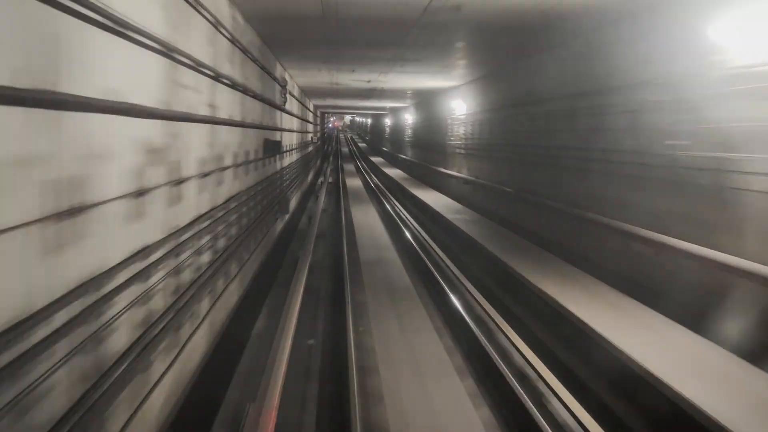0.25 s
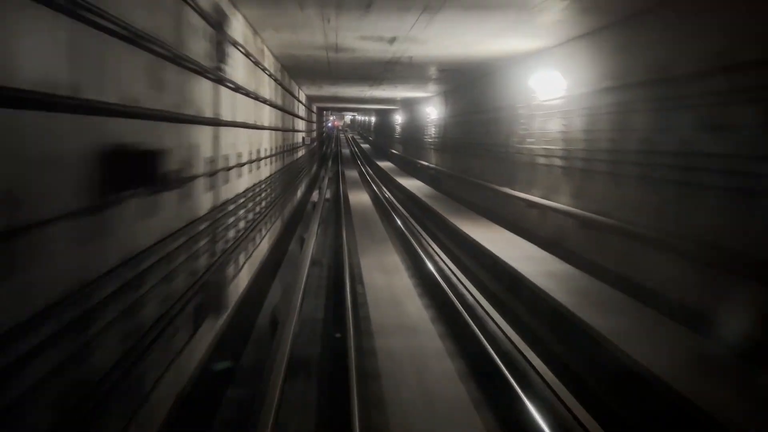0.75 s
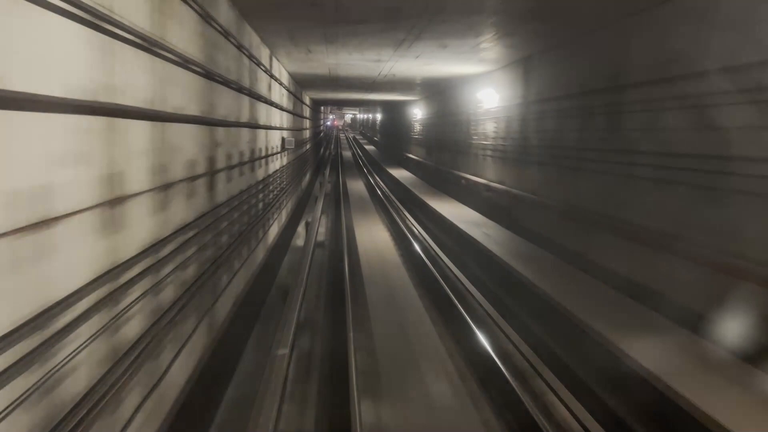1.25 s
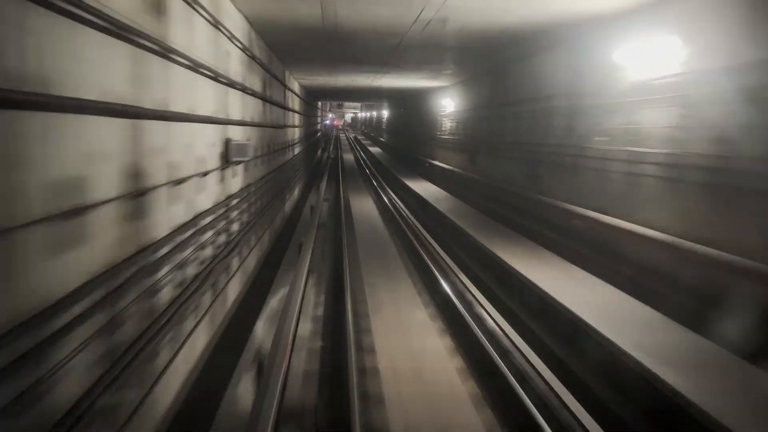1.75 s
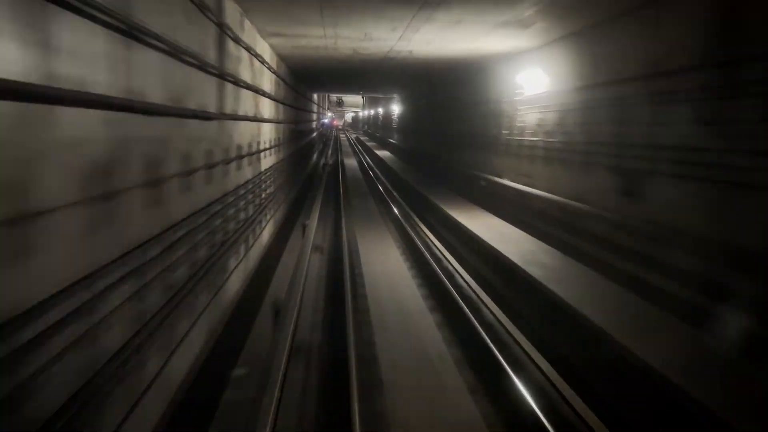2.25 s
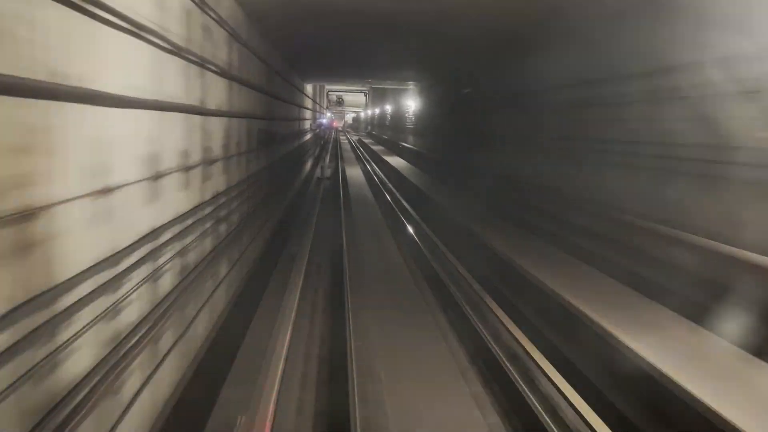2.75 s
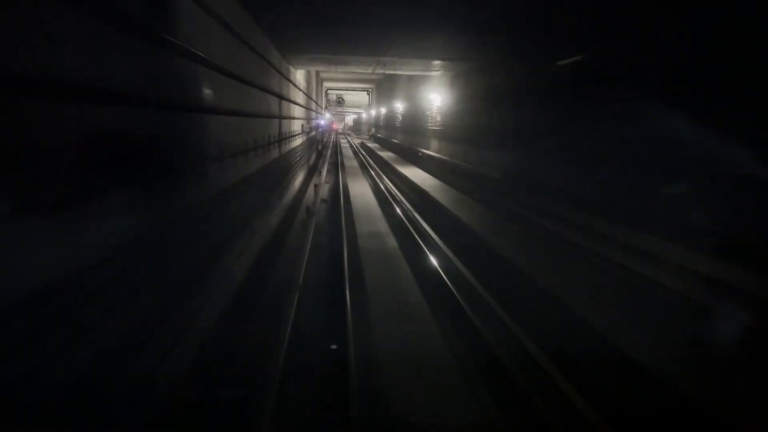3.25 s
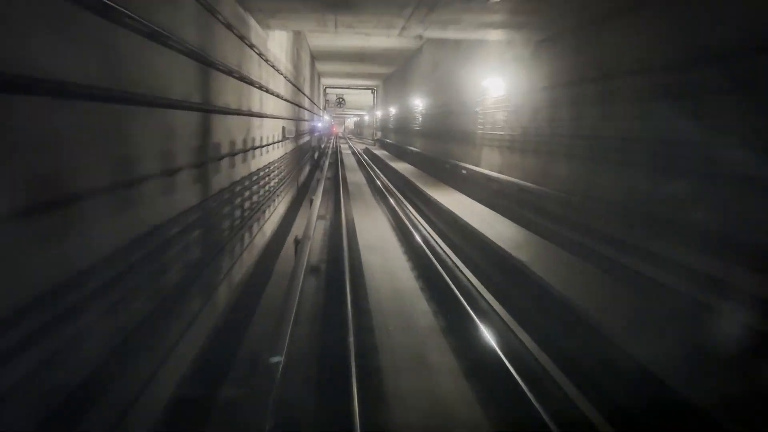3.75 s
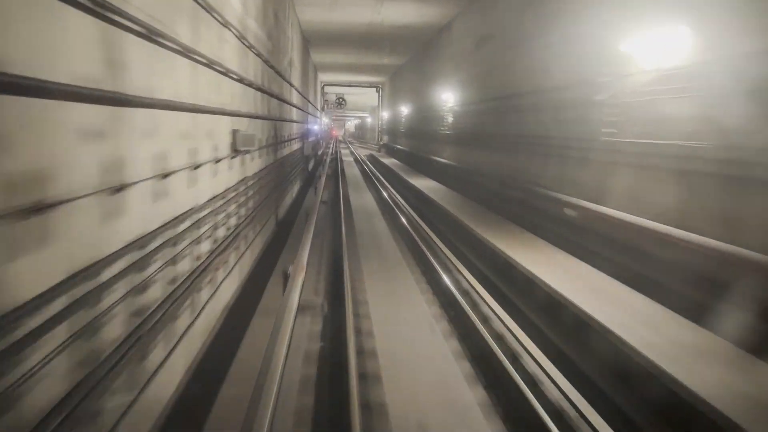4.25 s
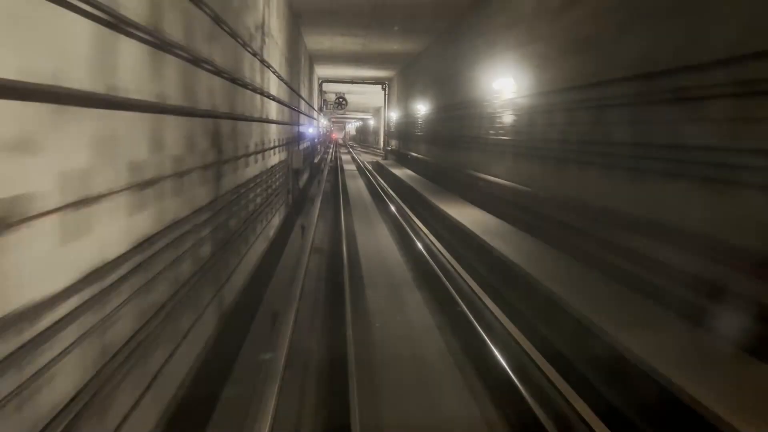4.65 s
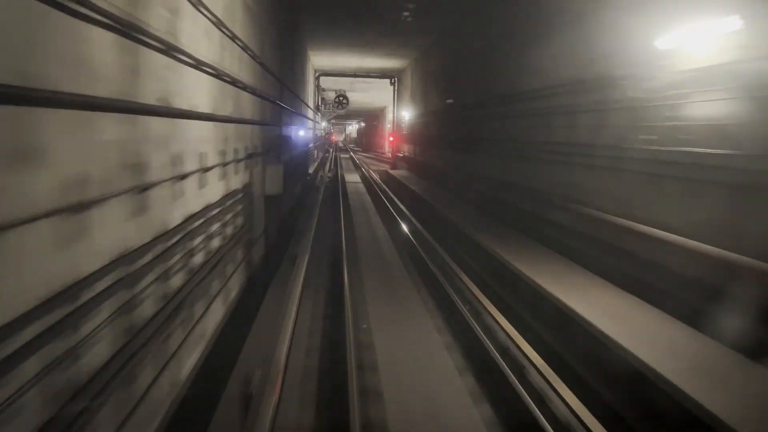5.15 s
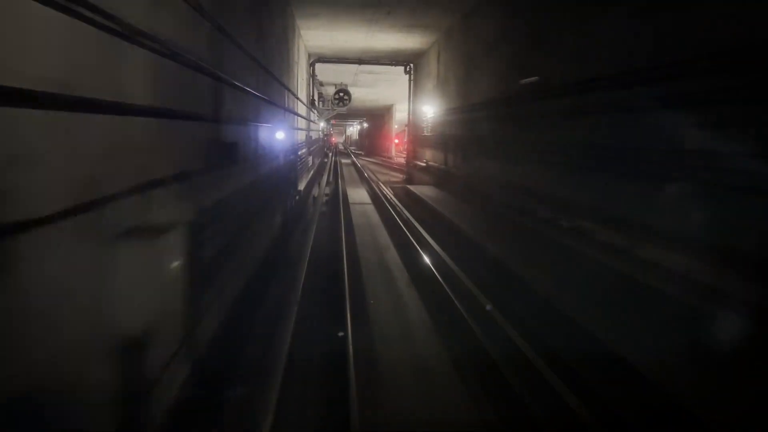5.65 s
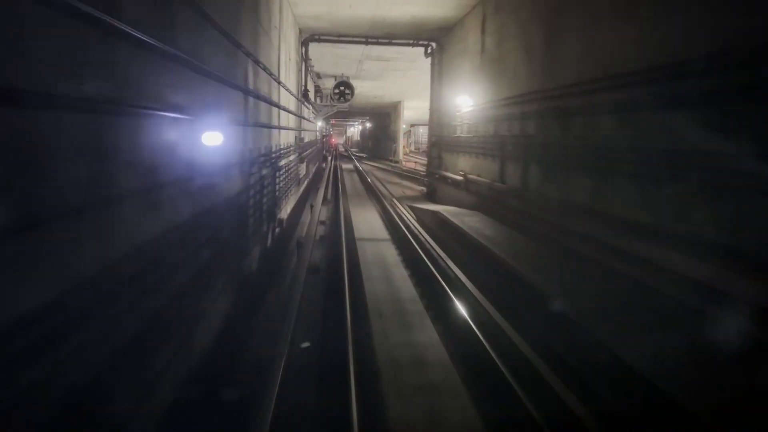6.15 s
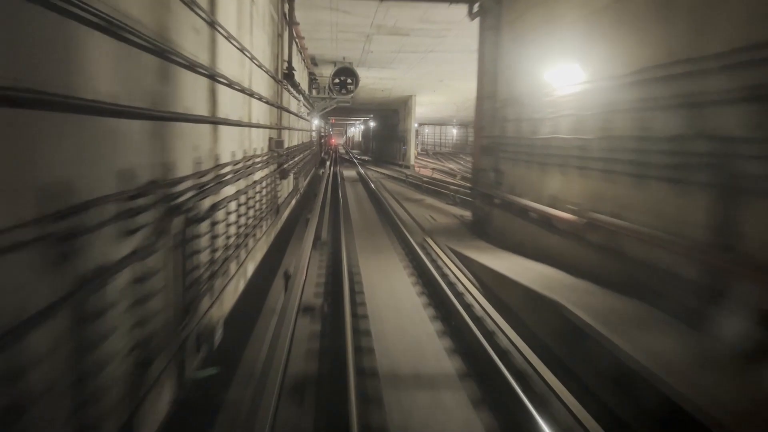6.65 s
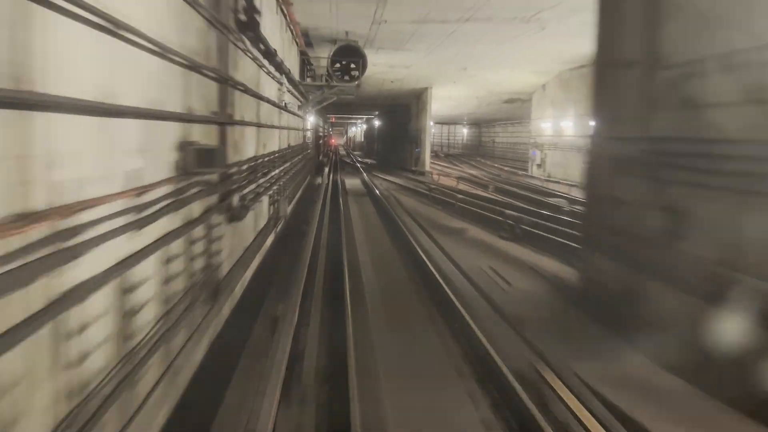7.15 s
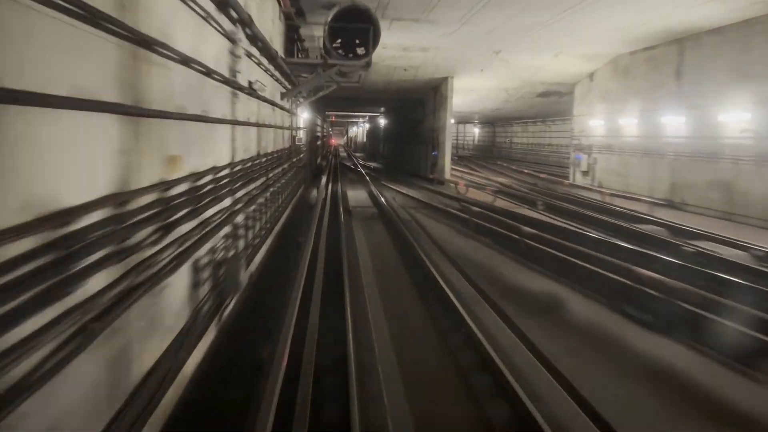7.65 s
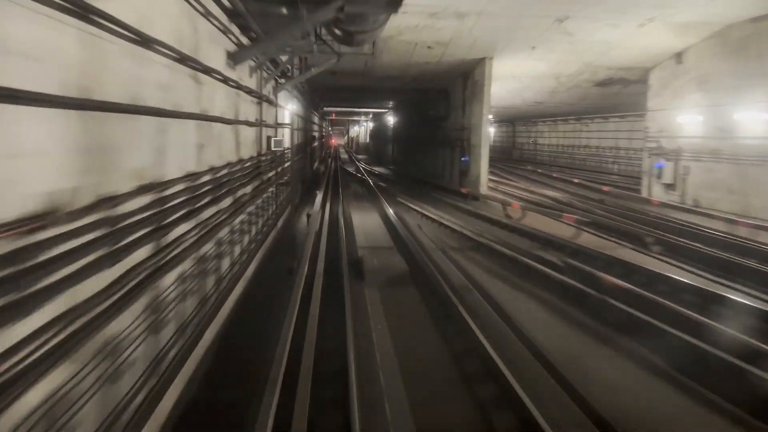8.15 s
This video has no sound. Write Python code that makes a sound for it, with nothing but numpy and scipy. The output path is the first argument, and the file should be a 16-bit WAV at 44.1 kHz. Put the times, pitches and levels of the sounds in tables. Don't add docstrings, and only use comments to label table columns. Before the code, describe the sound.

Inside a speeding subway cab, rails sing a wavering low-mid drone over bass rumble and motor hum, with small panel ticks and late flange moans.

```python
import sys
import numpy as np
from scipy import signal
from scipy.io import wavfile
from scipy.ndimage import uniform_filter1d

SR = 44100
rng = np.random.default_rng(int(sys.argv[2]) if len(sys.argv) > 2 else 0)


def rack_gain(trim_db):
    fader = np.asarray(trim_db, float)
    return 10 ** (fader / 20)


def wav_record(signal):
    frames = np.transpose(np.atleast_2d(signal))
    bounded = np.clip(frames, -1, 1)
    quanta = np.round(bounded * 32767).astype(np.int16)
    wavfile.write(sys.argv[1], SR, quanta)


N = 370440


def evened(x):
    return x / np.sqrt(np.mean(x ** 2) + 1e-20)


def read(rows, hz):
    f, *columns = np.transpose(rows)
    return [np.interp(np.log(hz + 1), np.log(f + 1), c) for c in columns]


def follow(rows, t):
    s, *columns = np.transpose(rows)
    return [np.interp(t, s, c) for c in columns]


def bump(t, middle, length):
    return np.cos(np.pi * np.clip((t - middle) / length, -.5, .5)) ** 2


def slow_noise(seconds):
    span = int(seconds * SR)
    return evened(uniform_filter1d(uniform_filter1d(rng.standard_normal(N), span), span))


def steadied(x, seconds, share):
    power = uniform_filter1d(x.mean(0) ** 2, int(seconds * SR))
    power = uniform_filter1d(power, int(seconds * SR / 2))
    return evened(x / (abs(power) + 1e-9) ** (np.clip(share, 0, 1) / 2))


# (time [s], level [dB])
WALLS = [(0, -0.5), (1.3, .5), (2.3, 0), (3.5, -0.5), (4.8, -1.5), (5.7, -1.5), (6.1, -1.5), (7.5, -2),
         (8.0, -4), (8.4, -5)]


def walls(t):
    return follow(WALLS, t)[0]


# (time [s], speed [share of full], width [share 0-1 of the wide tunnel section])
SPEED = [(0, 1, 0.11), (3.3, 1, 0), (4.8, 1, 0.5), (5.8, .98, 0.9), (6.4, .95, 1), (7.2, .93, 0.93),
         (8.4, 0.88, 0.84)]
# (frequency [Hz], width [Hz], narrow-tunnel level over the wash [dB], wide-tunnel level over the wash [dB])
WHEELS = [(358.5, 49, 8.5, 11.5), (727.4, 36, 7.5, 9.5), (2170, 150, 7.5, 7), (2550, 90, -3, 10),
          (2954, 140, 8, -7.5)]
# (frequency [Hz], width [Hz], narrow-tunnel level over the wash [dB], wide-tunnel level over the wash [dB])
CAB = [(478, 20, 3, 2), (580, 18, 5, 4), (630, 16, 6, 9), (800, 20, 3, 0), (890, 25, 5, 3),
       (1003, 22, 5, 9), (1102, 28, 7, 5), (1230, 25, 5, 5), (1570, 60, 0, -3), (2095, 30, 3, 0),
       (2215, 18, 5, 0), (3390, 25, 2, 2), (4850, 320, 3, 3)]


def resonances(hz, t):
    speed, wide = follow(SPEED, t)
    wide = np.clip(wide, 0, 1)
    lift = 1
    for modes, factor in ((WHEELS, speed), (CAB, np.ones_like(speed))):
        for mode_hz, width, narrow_db, wide_db in modes:
            peak = 1 / (1 + (2 * (hz[:, None] - mode_hz * factor) / width) ** 2)
            lift = lift + rack_gain(2 * (narrow_db + wide * (wide_db - narrow_db))) * peak
    return 10 * np.log10(lift)


# (frequency [Hz], likeness [0-1], left lead [rad], left minus right level [dB])
PORTS = [(30, 1, 0, 0), (190, .996, 0, -.4), (370, .95, .15, -3), (480, .8, .1, -2), (570, .45, .5, -2),
         (700, .7, .3, 0), (830, .35, 2.3, 0), (1050, .85, 3, -3), (1400, .3, 3, 0), (2600, .4, .7, 1),
         (3500, .15, .5, 2), (5500, .15, .8, 8), (7800, .35, 1, 1), (10000, .9, -3.1, 0),
         (11800, .95, -6.3, 0), (15600, .95, -12.6, 0)]


def wash(colour, patchy_db, ringing=True):
    frame, hop = 4096, 1024
    hz = np.fft.rfftfreq(frame, 1 / SR)
    t = np.arange(N // hop + 5) * hop / SR
    silent = np.count_nonzero(hz > colour[-1][0])
    hz = hz[:-silent]
    a, b, c, d, patches = rng.standard_normal((len(t), len(hz), 5)).T
    patches = uniform_filter1d(patches, size=20, axis=0)
    patches = evened(uniform_filter1d(patches, size=5, axis=1))
    field_db = read(colour, hz)[0][:, None] + patchy_db * patches
    if ringing:
        field_db = field_db + resonances(hz, t)

    same, lead, pan_db = (v[:, None] for v in read(PORTS, hz))
    same = np.clip(same, 0, 1)
    left = a + 1j * b
    right = same * left * np.exp(-1j * lead) + np.sqrt(1 - same ** 2) * (c + 1j * d)
    z = np.array([left * rack_gain(pan_db / 2), right * rack_gain(-pan_db / 2)]) * rack_gain(field_db)
    z = np.pad(z, ((0, 0), (0, silent), (0, 0)))
    x = signal.istft(z, nperseg=frame, noverlap=frame - hop)[1][:, :N]
    return x / np.sqrt(np.mean(x.mean(0) ** 2))


# (middle time [s], length [s], level [dB], pitch [Hz])
PATCHES = [(0.251, .16, -17, 368.8), (0.559, 0.13, -22.5, 368.8), (0.908, 0.21, -16.5, 371),
           (1.118, 0.23, -21.5, 370), (1.464, 0.14, -14.5, 366), (1.88, 0.17, -22, 371),
           (2.114, 0.12, -18, 366), (2.415, 0.24, -14, 364), (2.568, 0.11, -18, 359),
           (2.772, 0.14, -14, 366), (2.907, 0.13, -23, 363.2), (3.087, .14, -24, 362.6),
           (3.239, .14, -22.5, 363.5), (3.452, 0.18, -16, 368.5), (3.661, 0.13, -22, 375),
           (3.987, 0.25, -18.5, 366), (4.147, 0.27, -18, 367.4), (4.384, .12, -18, 365),
           (4.631, 0.41, -12.5, 364.7), (4.875, 0.23, -15.5, 366.2), (5.022, 0.088, -21, 361),
           (5.279, .18, -19.5, 355.6), (5.753, 0.11, -20, 360.5), (6.048, 0.32, -20.5, 356.4),
           (6.269, 0.13, -18.5, 344), (6.496, .12, -19.5, 350.2), (6.7, .12, -20.5, 351.8),
           (6.856, 0.13, -18.5, 342.2), (7.329, .14, -23.5, 345), (7.837, 0.15, -22.5, 340)]


def ripples(t):
    smooth_rail_db, walls_share, flutter_db, ripple_hz = -25.5, 1.26, 4.5, 366
    flutter = np.minimum(slow_noise(0.032), .8)
    power = rack_gain(2 * (smooth_rail_db + walls_share * walls(t) + flutter_db * flutter))
    weighted = power * ripple_hz * follow(SPEED, t)[0]
    for s, length, level_db, hz in PATCHES:
        patch = rack_gain(2 * level_db) * bump(t, s, length)
        power = power + patch
        weighted = weighted + patch * hz
    return weighted / power, power


def drone(t):
    waver_hz, waver_s, inertia_s = 3.964, 0.0315, 0.0607
    braking_spread = 18.2
    hz, power = ripples(t)
    level_db = 10 * np.log10(power) - 5.0
    span = int(inertia_s * SR)
    hz = uniform_filter1d(hz * power, span) / uniform_filter1d(power, span)
    waver, apart = slow_noise(waver_s), slow_noise(waver_s)
    spread_hz = waver_hz * (1 + braking_spread * (1 - follow(SPEED, t)[0]))
    turn = 2 * np.pi * np.cumsum(hz + spread_hz * waver) / SR
    lead, pan_db = read(PORTS, hz)[1:]
    gain = rack_gain(level_db + np.array([pan_db, -pan_db]) / 2)
    return np.sqrt(2) * gain * np.cos([turn, turn - lead + 0.25 * apart])


# (middle time [s], length [s], level added to the rumble [dB])
JOLTS = [
    (0.0, 0.2, 1.5),
    (2.13, 0.24, 6),
    (2.28, .2, 6.5),
    (4.33, 0.1, 4),
    (7.503, 0.26, 1.5),
    (7.98, 0.23, 1.5),
]


def jolts(t):
    return sum(db * bump(t, s, length) for s, length, db in JOLTS)


# (frequency [Hz], density [dB per Hz])
RUMBLE = [(15, -40), (30, -16.5), (45, 2), (65, -5), (90, -4.5), (120, -0.5), (160, -5), (225, -5.5),
          (275, -12), (300, -19), (390, -42), (660, -120)]


def rumble(t):
    level_db = -29.7 + 0.35 * walls(t) + jolts(t)
    return rack_gain(level_db) * steadied(wash(RUMBLE, patchy_db=0.3, ringing=False), 0.25, share=0.71)


# (frequency [Hz], density [dB per Hz])
ROAR = [(270, -21.5), (295, -17), (320, -6), (400, -2), (470, -6.5), (540, -8), (700, -5), (850, -10),
        (950, -12), (1060, -20.5), (1180, -28), (1300, -34.5), (1700, -71.5)]


def roar(t):
    level_db = -22.5 + 1.04 * walls(t)
    return rack_gain(level_db) * steadied(wash(ROAR, patchy_db=1.0), .15, share=1.0)


# (frequency [Hz], density [dB per Hz])
HISS = [(900, -22), (1100, 2), (1550, 0.5), (1750, -6), (2300, -5.5), (3000, -12), (3250, -15), (3600, -24),
        (5000, -61)]


def hiss(t):
    return rack_gain(-45.98 + 0.9 * walls(t)) * wash(HISS, patchy_db=1.27)


# (frequency [Hz], density [dB per Hz])
AIR = [(2500, -32.5), (3500, 2), (4300, -0.5), (6000, -2.5), (7000, -6.5), (8300, -10), (9500, -13.5),
       (10400, -30.5), (11000, -29), (11900, -24), (12600, -34), (14000, -34.5), (15800, -42.5)]


def air_rush(t):
    return rack_gain(-61.08 + 0.7 * walls(t)) * wash(AIR, patchy_db=1.27)


# (frequency [Hz], left level [dB], right level [dB],
# time at which close tones are in step [s], left lead [rad])
MOTORS = [(44.77, -45, -45, 4.274, 0), (48.3, -46.5, -46.5, 4.274, 0), (121.79, -48, -47.5, 4.2, 0),
          (140.126, -48.5, -48.3, 4.254, 0), (143.431, -36, -36, 4.254, 0), (2400.95, -65, -78, 0, .8),
          (3728.69, -72, -90, 0, 2), (3872.1, -63.4, -65.8, 3.41, .47), (3872.586, -66.5, -61.7, 3.41, .13),
          (3919.29, -88, -82, 0, 1.7), (3966.07, -77, -89, 0, 0), (4012.708, -80.7, -82, .145, -1.1),
          (4016.019, -77.6, -80.6, .145, -1.1), (6001.3, -85, -92, 0, 1.6), (7696.4, -90, -97, 0, .7),
          (7984.2, -93, -90, 0, 1.2), (11761.2, -106, -106, 0, 0), (11904.6, -105, -105, 0, 0)]
# (time [s], left level [dB], right level [dB])
SWAY = [(0, -4, -6), (.95, -6, -3), (1.55, 4, 1), (2.1, -2, -1), (3.1, 1, -1), (3.6, -3, -1), (4.6, -3, -1),
        (5.6, 2, 1), (7.0, -2, -1), (7.6, 0, 2.5), (8.4, 4, 4)]


def motors(t):
    slip_hz = 3872.586
    slip_turns = .02 - .22 * np.exp(-t / .9)
    out = np.zeros((2, N))
    for hz, left_db, right_db, in_step, lead in MOTORS:
        slip = (hz == slip_hz) * slip_turns
        turn = 2 * np.pi * (hz * (t - in_step) + slip)
        sway_db = (abs(hz - slip_hz) < 1) * np.array(follow(SWAY, t))
        gain = rack_gain([[left_db], [right_db]] + sway_db)
        out += np.sqrt(2) * gain * np.cos([turn, turn - lead])
    return out


# (time [s], snap level [dB], rattle level re the snap [dB], rattle t60 [s])
TICKS = [(.9963, -50.5, -3, .45), (1.105, -53, -4, .45), (2.1, -62, 2, .6), (2.1882, -49, -6, .4),
         (2.3135, -49, -3, .55), (3.27, -62, 0, .3), (3.66, -66, 2, .9), (4.229, -43.5, -11, .5),
         (4.5965, -50, -11, .3), (4.6252, -46.5, -12, .45), (5.6406, -53, -7, .3), (6.399, -59, -3, .3),
         (6.913, -57, -8, .25), (7.72, -59, -4, .25)]
# (frequency [Hz], density [dB per Hz])
PANEL = [(1500, -30), (3500, -9), (5500, 0), (7000, -5), (9000, -12), (10500, -17), (11700, -13),
         (13000, -22), (15800, -26)]


def panel(t):
    power, age = np.zeros(N + SR), t[:SR]
    for s, snap_db, rattle_db, t60 in TICKS:
        snap = np.minimum(age / .001, 1) * rack_gain(-60 * age / .025)
        rattle = np.minimum(age / .008, 1) * rack_gain(rattle_db - 60 * age / t60)
        power[round(s * SR):][:SR] += rack_gain(2 * snap_db) * (snap ** 2 + rattle ** 2)
    noise = steadied(wash(PANEL, patchy_db=1.5, ringing=False), .003, share=0.76)
    return np.sqrt(power[:N]) * noise


# (time [s], length [s], start frequency [Hz], end frequency [Hz], level [dB])
MOANS = [
    (1.9, 0.56, 2935, 2900, -64),
    (2.899, .7, 1600, 1580, -58),
    (4.2, .3, 1567, 1560, -58.5),
    (5.801, 0.55, 437.4, 425, -31.5),
    (6.449, 0.32, 426, 424, -41),
    (7.246, 0.795, 409.3, 398, -36.5),
]


def moans(t):
    out = np.zeros(N)
    for s, length, start_hz, end_hz, level_db in MOANS:
        age = t[:int(length * SR)]
        turn = 2 * np.pi * (start_hz + (end_hz - start_hz) * age / (2 * length)) * age
        swell = rack_gain(level_db) * signal.windows.tukey(len(age), .6)
        out[round(s * SR):][:len(age)] += np.sqrt(2) * swell * np.sin(turn)
    return out * rack_gain([[-1.2], [1.2]])


def scene():
    t = np.arange(N) / SR
    rolling = drone(t) + rumble(t) + roar(t) + hiss(t) + air_rush(t)
    return rolling + motors(t) + panel(t) + moans(t)


def low_pass(x):
    return signal.sosfilt(signal.butter(12, 15720, fs=SR, output="sos"), x)


def record(dry):
    bass_cut = signal.butter(2, 38, "high", fs=SR, output="sos")
    fade = np.minimum(np.arange(N, 0, -1) / (.004 * SR), 1)
    heard = signal.sosfilt(bass_cut, dry) * fade
    return low_pass(heard)


dry = scene()
out = record(dry)
wav_record(out)
```